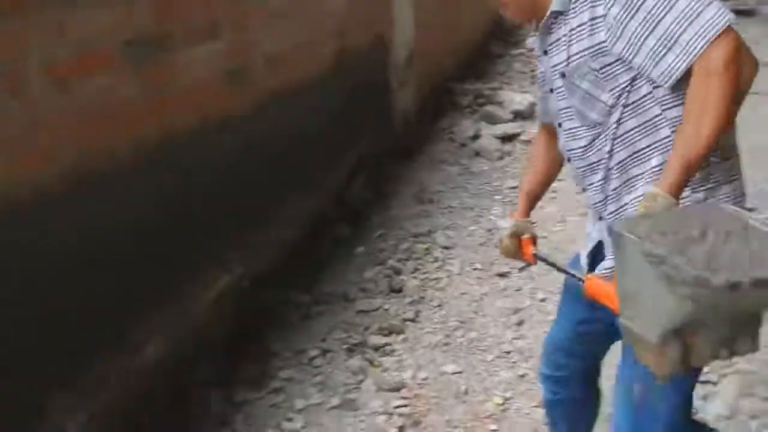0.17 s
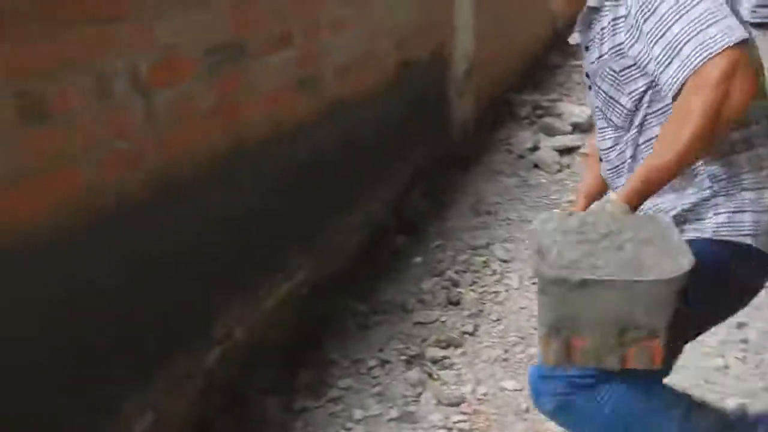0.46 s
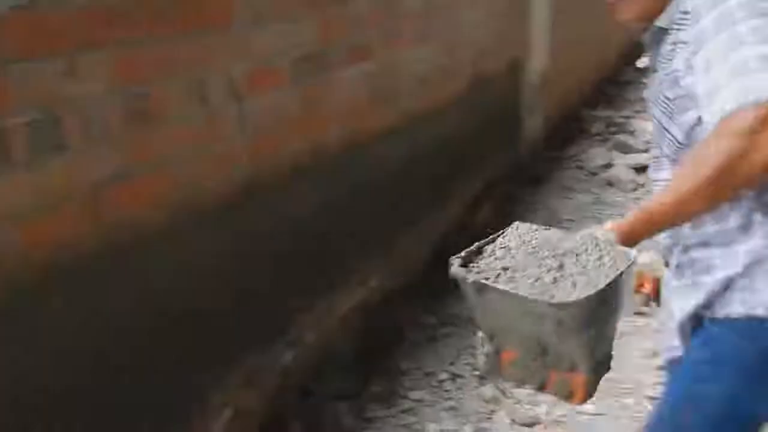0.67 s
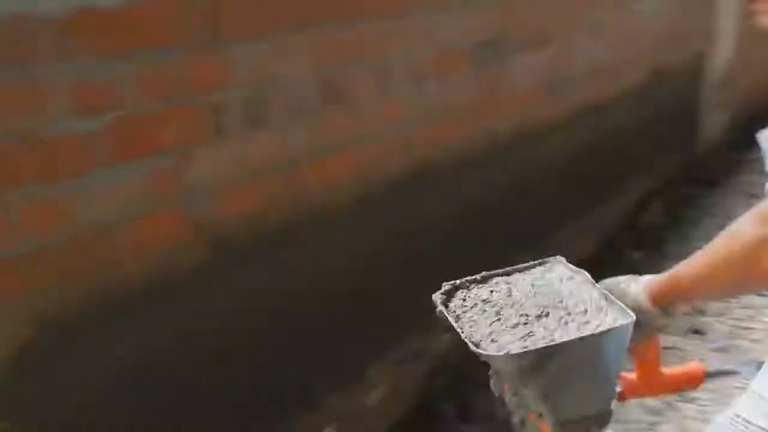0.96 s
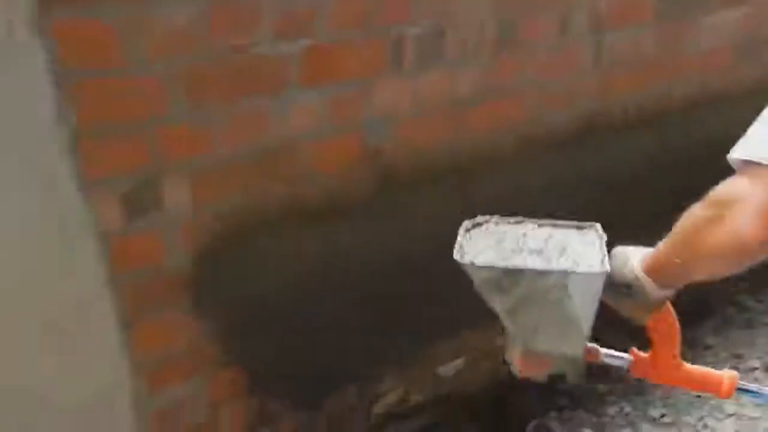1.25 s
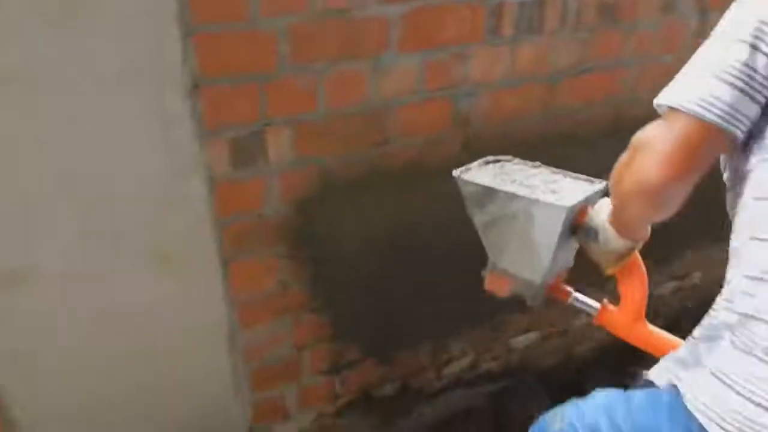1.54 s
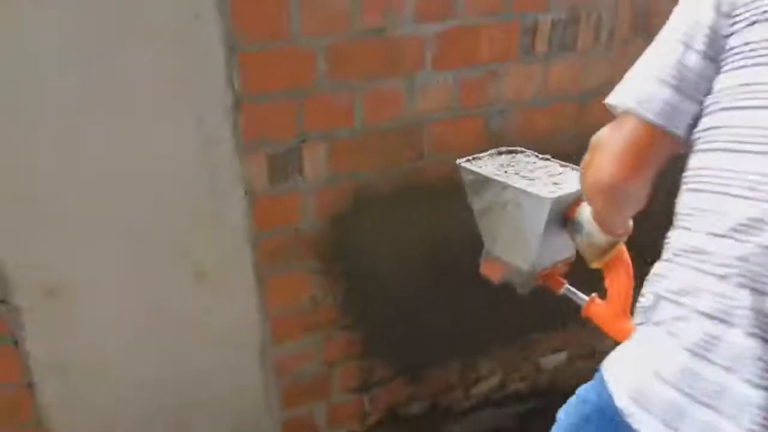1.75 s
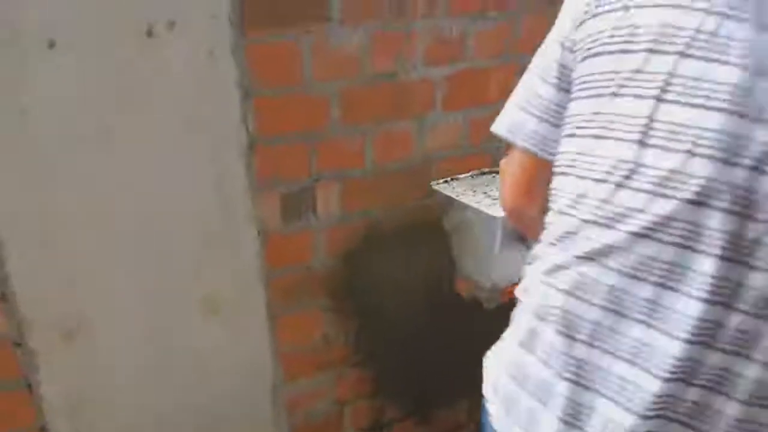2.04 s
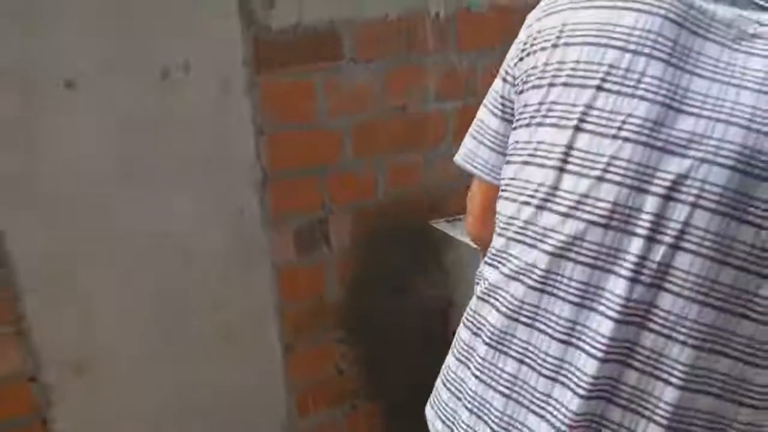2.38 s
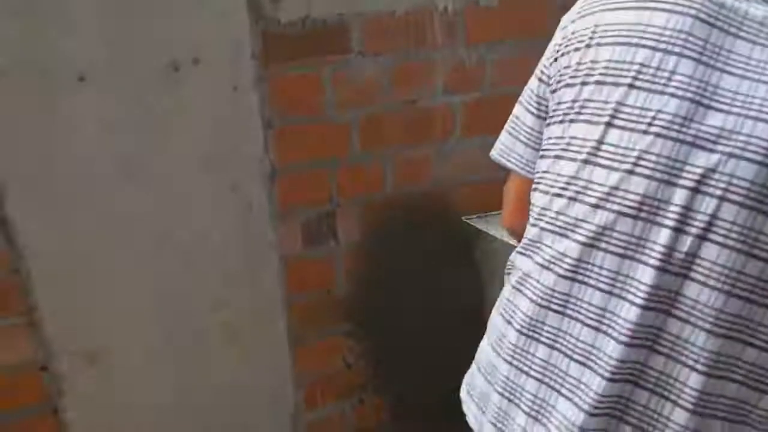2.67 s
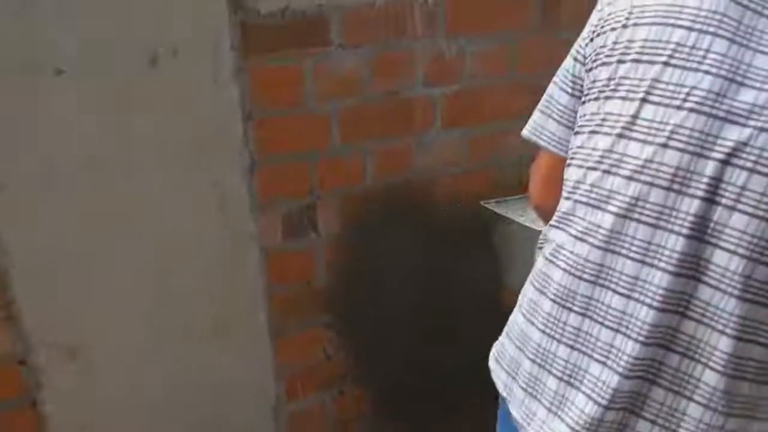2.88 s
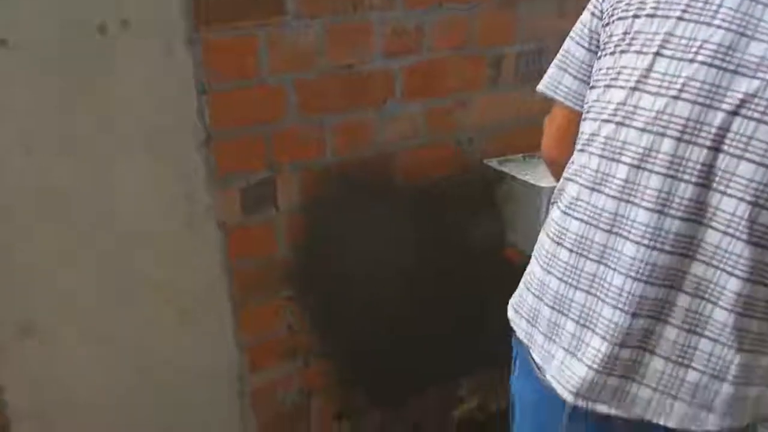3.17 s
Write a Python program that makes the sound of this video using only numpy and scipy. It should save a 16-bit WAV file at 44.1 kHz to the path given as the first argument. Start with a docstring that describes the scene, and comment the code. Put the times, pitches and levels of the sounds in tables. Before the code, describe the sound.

A compressor engine drones loudly and evenly outdoors beside a brick wall, with a faint air leak hissing; after two seconds a mortar sprayer bursts open close to the microphone, hissing, spluttering and gulping until the end.

```python
"""An engine-driven air compressor drones beside a brick wall: a sum of harmonics of its cycle, with clatter.
A hopper sprayer carried up to the wall leaks air, heard as a thin hiss of coloured noise.
Its trigger opens: an air jet and spluttering mortar (pulsed noise), gulps, bubbles (short sine bursts)
and grit on the bricks (random clicks of noise).
The recorder's gain control pushes the drone down under the blast and holds it there."""
import sys
import numpy as np
from scipy import signal
from scipy.fft import rfft, irfft, next_fast_len
from scipy.io import wavfile
from scipy.ndimage import uniform_filter1d

SR = 44100
rng = np.random.default_rng(int(sys.argv[2]) if len(sys.argv) > 2 else 0)


def wrap_up_sound(samples):
    """Save the sound to the file named by the first command line argument, as 16-bit audio."""
    columns = np.atleast_2d(samples).T
    # keep every value between -1 and 1, then stretch to whole-number steps
    tamed = np.clip(columns, -1, 1)
    steps = np.round(tamed * 32767).astype(np.int16)
    wavfile.write(sys.argv[1], SR, steps)


N = 145971
TIME = np.arange(N) / SR

# Engine cycle rate: time_s, rate_hz
CYCLE_RATE = [(0, 46.1), (.06, 45.9), (.83, 45.7), (.94, 46), (1.37, 46), (1.42, 45.8), (2.02, 45.6),
              (3.3, 45.7)]
# Level of the summed harmonics at the microphone: time_s, level_db
ENGINE_LEVEL = [(0, -18.5), (.4, -16.5), (.9, -17), (1.35, -17), (1.75, -17), (2.07, -16.5), (2.6, -17.5),
                (3.3, -14.5)]
# Relative strength of the engine harmonics: multiple, path_db, wall_db
HARMONICS = [(2,-20,-16),(3,-15,-15),(4,-1,-3),(5,-1.5,-3.5),(6,-19,-14.5),(7,-3.5,0.5),(8,-8,-11.5),(9,-3.5,-4),(10,-25,-14),(11,0.5,-1),(12,-2,-5),(13,-0.5,-3.5),(14,0,-5),(15,-14.5,-16),(16,-22,-6),(17,-18.5,-8.5),(18,-10.5,-10.5),(19,-22,-11),(21,-16.5,-18.5),(22,-23.5,-17),(23,-19,-16),(24,-18.5,-25),(25,-12.5,-16),(26,-21.5,-17),(28,-20,-16),(32,-21.5,-19.5),(33,-17,-12)]
# Harmonics that swell or sink on the way: multiple, centre_s, half_length_s, change_db
HARMONIC_SWELLS = [(32, 0.62, 0.31, 12), (7, 0.88, 0.2, 5.5), (7, 0.067, 0.2, -7), (18, .15, 0.36, -8)]
# The two ringing beats of each engine cycle: place_in_cycle (0-1), ring_hz, q
BEATS = [(.48, 205, 3.8), (.85, 330, 6)]
# One harmonic that sings out near the wall: time_s, level_db
WHINE_LEVEL = [(1.3, -36.5), (1.58, -26), (1.8, -29), (1.95, -17.5), (2.07, -15.5), (2.35, -16.5),
               (2.6, -23.5), (3.3, -40)]
# Tones beating against the harmonics: pitch_hz, level_db
HUM_TONES = [(210, -40), (856, -38)]
# Relative spectrum of the engine's rush and clatter: frequency_hz, density_db_per_hz
CLATTER_COLOUR = [(20, -23), (45, -6), (90, -3), (140, -7), (175, 5), (260, -4.5), (550, -4.5), (750, -8),
                  (1150, -12), (1350, -13.5), (1520, -14.5), (1800, -16.5), (2600, -29.5), (5000, -39)]
# Relative spectrum of the air leaking at the gun: frequency_hz, density_db_per_hz
LEAK_COLOUR = [(1200, -22), (2200, -1.5), (2700, -7.5), (3050, -6.5), (3180, 2.5), (3320, -5.5), (3720, 2),
               (4120, -0.5), (4350, 3.5), (4520, -3), (4900, -2.5), (5400, -2), (5800, 1.5), (6450, -8),
               (7300, -3.5), (7800, -6), (8070, 3), (8300, -3.5), (8650, -11), (9100, 0), (9580, 4),
               (10000, 1), (12000, -15.5)]
# Course of the blast, before the gain of each layer: time_s, air_db, mortar_db
BLAST = [(2.12,-23,-23), (2.2,-23.5,-31), (2.25,-22.5,-23), (2.31,-24,-28.5), (2.44,-26.5,-23),
         (2.51,-25.5,-32), (2.59,-25.5,-26), (2.68,-32,-31), (2.73,-25,-30), (2.785,-34,-32),
         (2.87,-30.5,-30.5), (2.98,-31,-32.5), (3.08,-26,-24.5), (3.12,-29.5,-26.5), (3.18,-26.5,-24),
         (3.265,-25,-24.5), (3.31,-27,-20.5)]
# Relative spectrum of the air jet: frequency_hz, density_db_per_hz
JET_COLOUR = [(300, -15), (1200, -8), (2400, 3), (2900, 0), (3300, 3.5), (4400, 2.5), (5500, 1.5),
              (6600, -1), (7600, 0), (8500, 2), (9500, 1), (11000, -15), (14000, -15)]
# Relative spectrum of the mortar in the nozzle: frequency_hz, density_db_per_hz
SPLUTTER_COLOUR = [(60, -17), (200, 4.5), (330, 4.5), (600, -4), (880, 6), (1120, -5), (1550, 5.5),
                   (2050, -3), (2450, 1.5), (3000, -7), (4500, -25), (9000, -24)]
# Low gulps of the hopper, before GULP_DB: time_s, level_db
GULP_LEVEL = [(2.12, -29), (2.22, -36), (2.34, -38), (2.39, -35), (2.6, -36.5), (2.79, -36), (2.9, -34),
              (3.0, -30), (3.3, -26)]
# Relative spectrum of the hopper: frequency_hz, density_db_per_hz
HOPPER_COLOUR = [(25, -33), (70, -20), (115, -10), (150, 1), (205, -8.5), (300, -7), (600, -40),
                 (1500, -53)]
# Relative spectrum of wet grit on the bricks: frequency_hz, density_db_per_hz
GRIT_COLOUR = [(300, -7), (1500, -3), (3000, 2.5), (5000, -7), (9500, 3), (14000, -20)]
# Bubbles bursting in the hopper: mid_rise_s, peak_db
BUBBLES = [(2.118, -12), (2.424, -9), (2.466, -8), (2.605, -12), (2.697, -8), (2.995, -9), (3.082, -8.5),
           (3.256, -10.5)]
# Clots of mortar spat from the nozzle: start_s, level_db
SPITS = [(2.254, -9), (2.401, -8), (2.425, -14), (2.746, -21), (3.171, -8), (3.256, -8)]
# Left-right correlation of the engine clatter: frequency_hz, likeness (-1 to 1)
ENGINE_LIKENESS = [(40, 0.97), (200, 1), (900, 0.9), (1700, 0.86), (2600, 0.4)]
# Left-right correlation of the leak: frequency_hz, likeness (-1 to 1)
LEAK_LIKENESS = [(2600, 0.34), (4500, 0.65), (8700, 0.38), (9300, 0.056)]
# Left-right correlation of the blast: frequency_hz, likeness (-1 to 1)
BLAST_LIKENESS = [(150, 0.93), (1100, 0.87), (1700, 0.99), (2700, 0.87), (3800, 0.54), (6000, 0.35),
                  (9500, 0.46)]

# Engine
WALK_MIDDLE_S, WALK_S = 1.51, .4
WHINE_MULTIPLE = 20
SPEED_JITTER = .0014  # rms fraction of the cycle rate
WAVER_DB, WEAK_WAVER_DB, UNEVEN_DB = .6, 1.2, .4  # rms; strong harmonics, weak ones, the whole drone
# rms phase spread, radians: strong harmonics, weak ones, and what the wall's reflection adds
SCATTER, WEAK_SCATTER, WALL_SCATTER = .1, 1.2, .45
CLATTER_DB, CLATTER_WAVER_DB, CLATTER_PATCHY_DB = -24.5, .36, .5
CLATTER_THROB = .27  # exponent of the pulsing, nepers
# Leak: its level starts LEAK_FAR_DB lower and settles exponentially
LEAK_DB, LEAK_FAR_DB, LEAK_APPROACH_S = -30.5, -2, .35
LEAK_WAVER_DB, LEAK_PATCHY_DB = .5, 3.5
# Blast
OPEN_S, OPEN_RISE_S, SURGE_DB, SURGE_DECAY_S = 2.086, .007, 1, .02
JET_DB, SPLUTTER_DB, GULP_DB, SPATTER_DB = 16, 14.5, 12.5, 7  # gains on top of the time tables
JET_ROUGH_DB, SPLUTTER_ROUGH_DB, GULP_ROUGH_DB = .7, 1.8, 2  # rms pulsing of the noise
JET_PATCHY_DB, SPLUTTER_PATCHY_DB = 3.5, 1
SPATTER_PER_S, SPATTER_SPREAD_DB, SPATTER_DECAY_S = 150, 3.8, .0014
BUBBLE_HZ, BUBBLE_RISE_S, SPIT_RISE_S = 161.5, .01, .0018
# Left over right, dB
ENGINE_PAN_DB, LEAK_PAN_DB, JET_PAN_DB = .68, -1, -1
# Recorder
DUCK_ABOVE_DB, DETECT_HZ, EDGE_HZ = -19, 2600, 9680


def amp(db):
    """Logarithmic level: decibels to amplitude gain."""
    return 10 ** (np.asarray(db) / 20)


def unit(x):
    """Power normalisation: scales to rms 1."""
    return x / np.sqrt(np.mean(x ** 2) + 1e-20)


def curve(rows, column=1):
    """Linear interpolation: one column of a time table, sample by sample."""
    rows = np.asarray(rows)
    return np.interp(TIME, rows[:, 0], rows[:, column])


def spectrum(rows, hz):
    """Logarithmic frequency scale: interpolates a spectral table along it."""
    f, value = np.transpose(rows)
    return np.interp(np.log(hz + 1), np.log(f + 1), value)


def wander(hz):
    """Band-limited random fluctuation: low-passed noise of rms 1, up to about the given rate."""
    size, rate = 2048, 500
    f = np.fft.rfftfreq(size, 1 / rate)
    lowpass = 1 / np.sqrt(1 + (f / hz) ** 6)
    slow = unit(irfft(rfft(rng.standard_normal(size)) * lowpass))
    return np.interp(TIME, np.arange(size) / rate, slow)


def pan(db):
    """Interchannel level difference: left and right gains."""
    return amp(np.array([[db], [-db]]) / 2)


def rush(colour, likeness, drive=1):
    """Turbulence noise: partly correlated stereo, pulsed by drive and then coloured; rms 1."""
    size = next_fast_len(N + 4096)
    hz = np.fft.rfftfreq(size, 1 / SR)
    mid, side = rfft(rng.standard_normal((2, N)) * drive, size)
    c = np.clip(spectrum(likeness, hz), -1, 1)
    mid = mid * np.sqrt(1 + c)
    side = side * np.sqrt(1 - c)
    stereo = np.array([mid + side, mid - side])
    return unit(irfft(stereo * amp(spectrum(colour, hz)), size)[:, :N])


def patchy(x, depth_db, frames, bins):
    """Time-frequency modulation: the colour flutters in random patches; rms 1."""
    z = signal.stft(x, nperseg=512, noverlap=384)[2]
    field = rng.standard_normal(z.shape[1:])  # the same for both channels
    field = uniform_filter1d(field, frames, axis=1)
    field = unit(uniform_filter1d(field, bins, axis=0))
    fluttering = signal.istft(z * amp(depth_db * field), nperseg=512, noverlap=384)[1]
    return unit(fluttering[:, :N])


def swell(start, rise):
    """Transient envelope: peaks at 1 after rise seconds and dies away."""
    u = np.maximum(TIME - start, 0) / rise
    return u * np.exp(1 - u)


def beat_phase(multiple):
    """Resonance phase: what two ringing beats in each cycle give a harmonic."""
    hz = multiple * CYCLE_RATE[0][1]
    response = 0
    for place, ring, q in BEATS:
        delay = np.exp(-2j * np.pi * multiple * place)
        response += delay / (1 + 1j * q * (hz / ring - ring / hz))
    return np.angle(response)


def engine_harmonics(angle):
    """Fourier synthesis: harmonics of the engine cycle, rebalanced as the microphone nears the wall."""
    near = np.clip((TIME - WALK_MIDDLE_S) / WALK_S + .5, 0, 1)
    drone = np.zeros(N)
    for multiple, path_db, wall_db in HARMONICS:
        level = path_db + near * (wall_db - path_db)
        for swelling, centre, half, db in HARMONIC_SWELLS:
            if swelling == multiple:
                level = level + db * np.exp(-((TIME - centre) / half) ** 2)
        strong = path_db > -8
        waver = WAVER_DB if strong else WEAK_WAVER_DB
        scatter = SCATTER if strong else WEAK_SCATTER
        lag = scatter * rng.standard_normal() - beat_phase(multiple)
        lag = lag + near * WALL_SCATTER * rng.standard_normal()
        drone += amp(level + waver * wander(hz=5.2)) * np.cos(multiple * angle - lag)
    level = curve(ENGINE_LEVEL) + UNEVEN_DB * wander(hz=30)
    return amp(level) * unit(drone)


def engine_whine(angle):
    """Single harmonic: one multiple of the engine cycle swells and sinks by itself."""
    return amp(curve(WHINE_LEVEL) + WAVER_DB * wander(hz=21)) * np.cos(WHINE_MULTIPLE * angle)


def engine_clatter(angle):
    """Amplitude-modulated noise: two unequal pulses of clatter in each engine cycle."""
    strokes = np.exp(CLATTER_THROB * (np.cos(2 * angle) - .41 * np.cos(angle)))
    noise = patchy(rush(CLATTER_COLOUR, ENGINE_LIKENESS, strokes), CLATTER_PATCHY_DB, frames=14, bins=4)
    return amp(CLATTER_DB + CLATTER_WAVER_DB * wander(hz=5.2)) * noise


def hum():
    """Beating: tones of fixed level and drifting phase interfere with the harmonics."""
    return sum(amp(db) * np.cos(2 * np.pi * hz * TIME + wander(hz=2)) for hz, db in HUM_TONES)


def engine():
    """Periodic excitation: one jittered cycle angle drives harmonics, whine and clatter; hum is free."""
    rate = curve(CYCLE_RATE) * (1 + SPEED_JITTER * wander(hz=18.5))
    angle = 2 * np.pi * np.cumsum(rate) / SR
    sound = engine_harmonics(angle) + engine_whine(angle) + hum() + engine_clatter(angle)
    return pan(ENGINE_PAN_DB) * sound


def leak():
    """Turbulent outflow: a thin, fluttering hiss from the gun, growing as it comes closer."""
    level = LEAK_DB + LEAK_FAR_DB * np.exp(-TIME / LEAK_APPROACH_S) + LEAK_WAVER_DB * wander(hz=13)
    hiss = patchy(rush(LEAK_COLOUR, LEAK_LIKENESS), LEAK_PATCHY_DB, frames=8, bins=2)
    return pan(LEAK_PAN_DB) * amp(level) * hiss


def air_jet(lumps):
    """Jet noise: a broadband hiss, roughened by the passing lumps."""
    noise = rush(JET_COLOUR, BLAST_LIKENESS, amp(JET_ROUGH_DB * lumps))
    return pan(JET_PAN_DB) * amp(JET_DB) * patchy(noise, JET_PATCHY_DB, frames=18, bins=3)


def mortar_splutter(lumps):
    """Two-phase flow: low noise pulsed by the lumps and a faster fluctuation."""
    pulses = amp(SPLUTTER_ROUGH_DB * unit(lumps + wander(hz=120)))
    noise = rush(SPLUTTER_COLOUR, BLAST_LIKENESS, pulses)
    return amp(SPLUTTER_DB) * patchy(noise, SPLUTTER_PATCHY_DB, frames=4, bins=5)


def hopper_gulp(lumps):
    """Cavity colouring: low noise from the hopper, roughened by the lumps."""
    noise = rush(HOPPER_COLOUR, BLAST_LIKENESS, amp(GULP_ROUGH_DB * lumps))
    return amp(curve(GULP_LEVEL) + GULP_DB) * noise


def grit_spatter():
    """Random impacts: grit strikes the wall in decaying clicks of noise of unequal strength."""
    strength = amp(SPATTER_SPREAD_DB * np.minimum(rng.exponential(1, N), 3))
    hits = (rng.random(N) < SPATTER_PER_S / SR) * strength
    bursts = signal.lfilter([1], [1, -np.exp(-1 / (SPATTER_DECAY_S * SR))], hits)
    return amp(SPATTER_DB) * rush(GRIT_COLOUR, BLAST_LIKENESS, bursts)


def bubbles():
    """Bubble oscillation: air breaks back through the mortar in short, low bloops."""
    sound = np.zeros(N)
    for middle, db in BUBBLES:
        tone = np.sin(2 * np.pi * BUBBLE_HZ * TIME + wander(hz=12.3))
        sound += amp(db) * swell(middle - BUBBLE_RISE_S / 2, BUBBLE_RISE_S) * tone
    return sound


def mortar_spits():
    """Impulsive release: clots leave the nozzle as brief bursts of splutter noise."""
    envelope = sum(amp(db) * swell(start, SPIT_RISE_S) for start, db in SPITS)
    return envelope * rush(SPLUTTER_COLOUR, BLAST_LIKENESS)


def sprayer():
    """Valve-gated flow: the opening, with a brief surge, releases every sound of the blast."""
    since = np.maximum(TIME - OPEN_S, 0)
    valve = np.minimum(since / OPEN_RISE_S, 1) * amp(SURGE_DB * np.exp(-since / SURGE_DECAY_S))
    lumps = wander(hz=59.4)  # shared by jet, splutter and gulp
    air = amp(curve(BLAST, column=1)) * air_jet(lumps)
    mortar = amp(curve(BLAST, column=2)) * (mortar_splutter(lumps) + grit_spatter())
    return valve * (air + mortar + hopper_gulp(lumps) + bubbles() + mortar_spits())


def scene():
    """Superposition: compressor, leak and blast together."""
    return engine() + leak() + sprayer()


def record(dry):
    """Gain reduction: treble peaks push the level down, where it stays; then a low-pass band limit."""
    highpass = signal.butter(2, DETECT_HZ, "high", fs=SR, output="sos")
    treble = signal.sosfilt(highpass, dry)
    power = abs(uniform_filter1d((treble ** 2).mean(0), size=500))
    power_db = 10 * np.log10(power + 1e-12)
    held_db = np.maximum.accumulate(power_db)  # highest treble level so far
    over_db = np.maximum(held_db - DUCK_ABOVE_DB, 0)
    ducked = dry / amp(uniform_filter1d(over_db, size=100))
    lowpass = signal.firwin(1023, EDGE_HZ, window=("kaiser", 9), fs=SR)
    return signal.oaconvolve(ducked, lowpass[None], "same")


dry = scene()
out = record(dry)
wrap_up_sound(out)
```